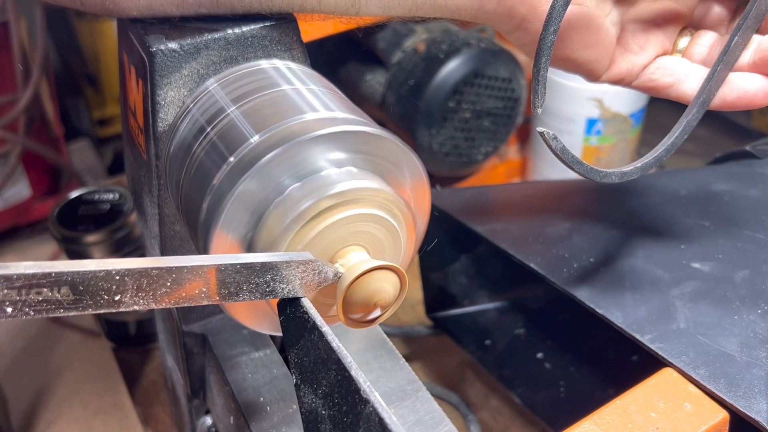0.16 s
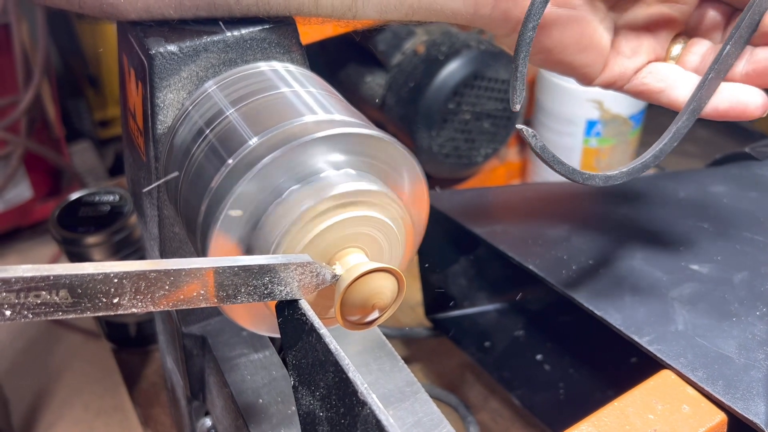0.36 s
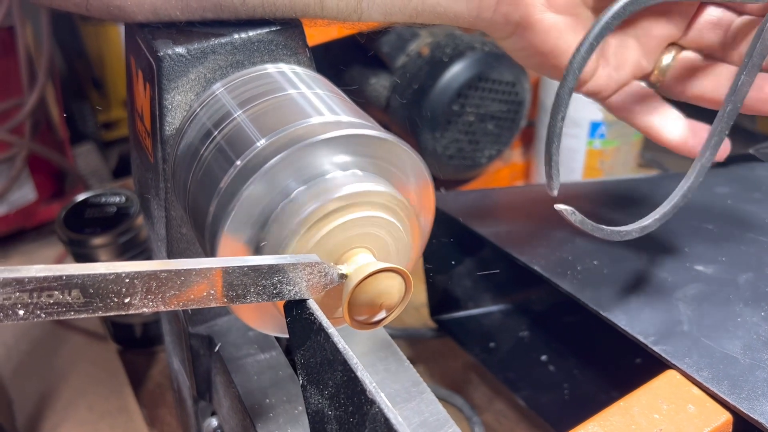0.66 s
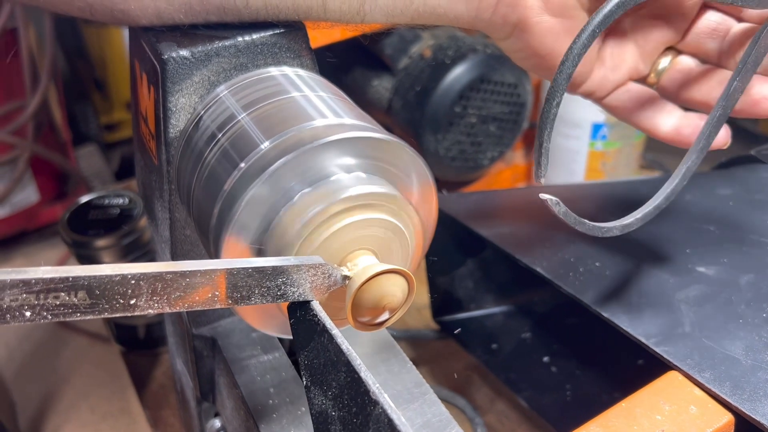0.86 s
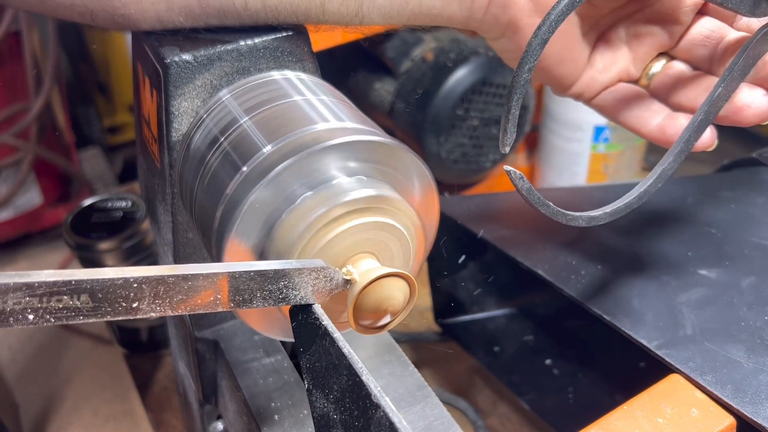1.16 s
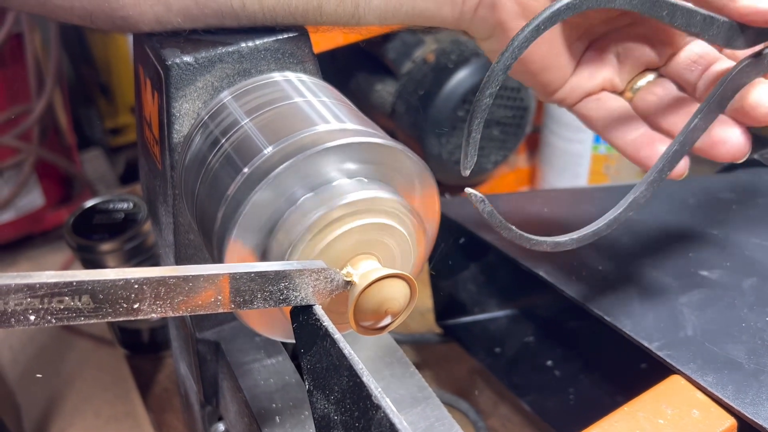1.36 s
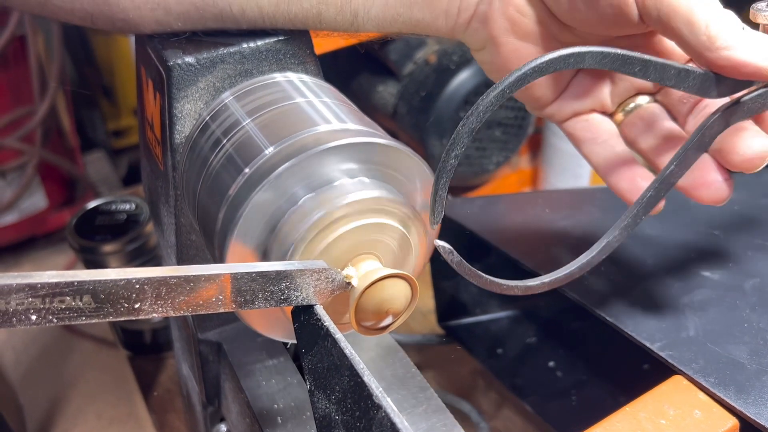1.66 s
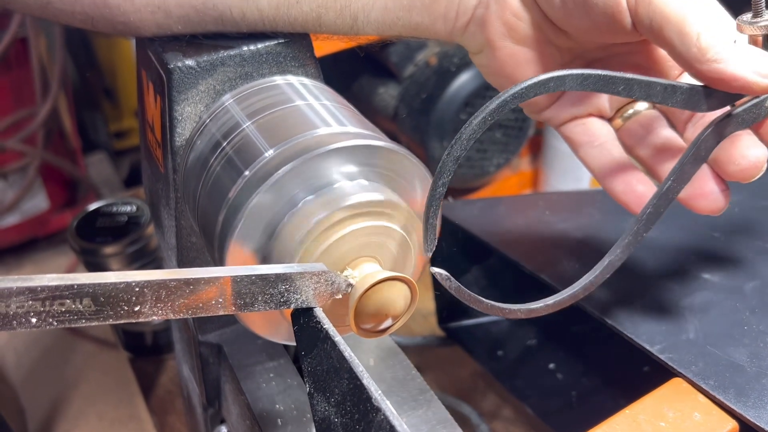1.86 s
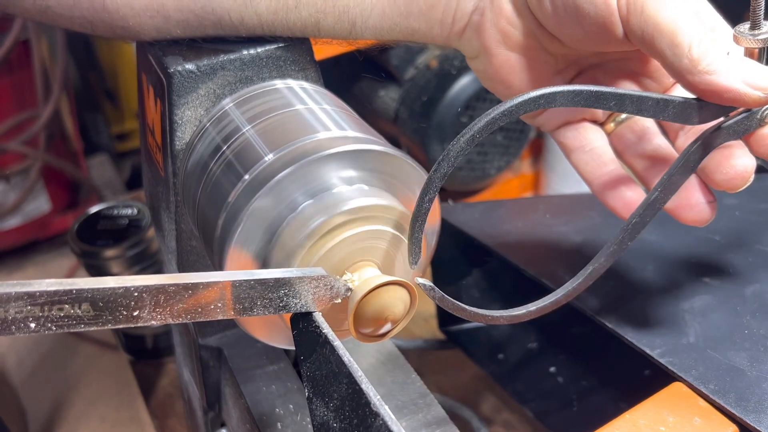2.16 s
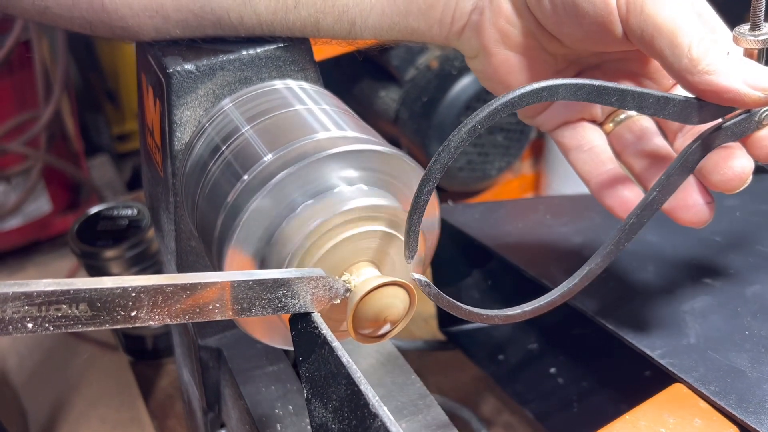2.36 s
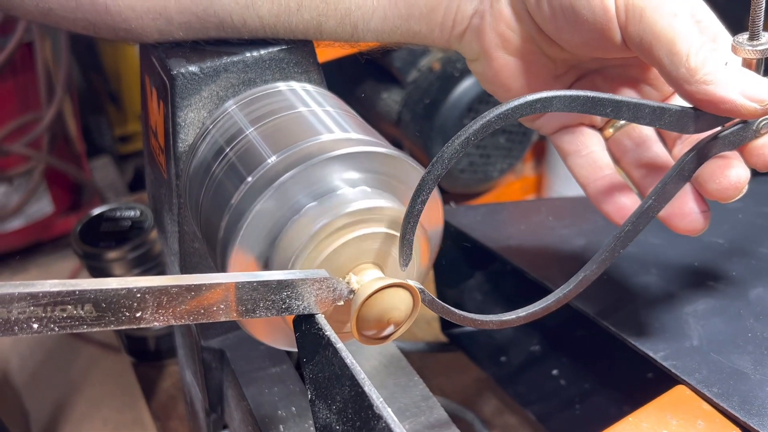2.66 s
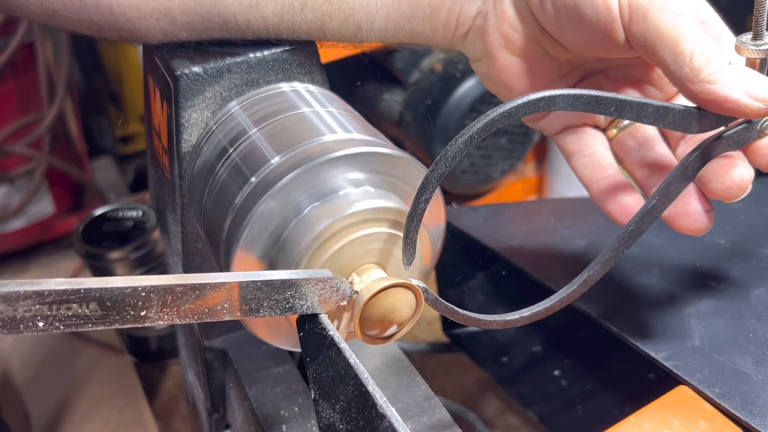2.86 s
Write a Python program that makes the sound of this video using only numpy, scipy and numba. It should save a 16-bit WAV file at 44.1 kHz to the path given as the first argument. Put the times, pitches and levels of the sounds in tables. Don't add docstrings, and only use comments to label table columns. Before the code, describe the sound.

A blade cuts spinning wood on a lathe with a continuous shrill, rough squeal, growing louder after the first second, over motor and belt hum, buzzing tool rest and hissing dust, heard close in a workshop.

```python
import sys
import numpy as np
from scipy import signal
from scipy.fft import rfft, irfft
from scipy.io import wavfile
from scipy.ndimage import uniform_filter1d, map_coordinates
from numba import njit

SR = 44100
rng = np.random.default_rng(int(sys.argv[2]) if len(sys.argv) > 2 else 0)


def to_wav(sig):
    pcm = np.clip(np.atleast_2d(sig), -1, 1) * 32767
    pcm = np.round(pcm).astype(np.int16)
    wavfile.write(sys.argv[1], SR, pcm.T)


def ratio(d):
    e = np.asarray(d, float) / 20
    return 10 ** e


N = 132300
T = np.arange(N) / SR
TURN_HZ = 46.9

# angle_turns, width_turns, level_db over soft wood, start_s, end_s
CHIP_SPOTS = [
    (.12, 0.018, 4.7, 3, 0.91),
    (.06, 0.025, 6.2, 2, 2.7),
    (.28, 0.06, 4.3, 0.2, 0.38),
    (.28, 0.033, 6.1, 2.5, 3.3),
    (.85, 0.068, 2.9, -0.5, 1.0),
    (.86, 0.021, 3.6, -2, 3.3),
]


def level(x, db):
    return x * ratio(db) / np.sqrt(np.mean(x ** 2))


@njit
def svf(x, hz, width):
    y = np.empty(len(x))
    band, low = 0., 0.
    for i in range(len(x)):
        g = np.tan(np.pi * hz[i] / SR)
        k = width / hz[i]
        v = (band + g * (x[i] - low)) / (1 + g * (g + k))
        band = 2 * v - band
        low = low + 2 * g * v
        y[i] = k * v
    return y


def walk(rate):
    hold = int(SR / rate)
    steps = np.repeat(rng.standard_normal(N // hold + 1), hold)
    return 1.24 * uniform_filter1d(uniform_filter1d(steps, hold), hold)[:N]


def colour(x, points):
    hz, db = np.array(points, float).T
    log_hz = np.log(np.arange(N // 2 + 1) * SR / N + 1)
    return irfft(rfft(x) * ratio(np.interp(log_hz, np.log(hz), db, -90, -90)), N)


def place(x, pan_db, lead):
    port = np.array([[.5], [-.5]])
    return np.real(x * np.exp(1j * lead * port)) * ratio(pan_db * port)


def spin():
    # time_s, lead_turns
    slip_points = [(0, .016), (.16, .075), (.31, .113), (.46, .132), (.61, .139), (.76, .138), (.91, .127),
                   (1.06, .104), (1.2, .076), (1.35, .051), (1.5, .03), (1.65, .015), (1.8, .006), (2.1, 0),
                   (2.7, .006), (3, -.003)]
    slip = uniform_filter1d(np.interp(T, *np.array(slip_points).T), size=5000)
    belt_hz, belt_turns, belt_rad = 13.48, .0017, 1.62
    return TURN_HZ * T + 1 + slip + belt_turns * np.cos(2 * np.pi * belt_hz * T + belt_rad)


def grain(turns):
    sameness = .992
    size = int(SR / TURN_HZ) + 1
    rim = rng.standard_normal((int(turns[-1]) + 2, size))
    for k in range(1, len(rim)):
        rim[k] = sameness * rim[k - 1] + np.sqrt(1 - sameness ** 2) * rim[k]
    return map_coordinates(rim.ravel(), [turns * size])


def bite(turns, spots):
    fade_s = 0.31
    force_db = 0
    for angle, width, db, start, end in spots:
        life = np.clip(np.minimum(T - start, end - T) / fade_s + .5, 0, 1)
        distance = (turns - angle + .5) % 1 - .5
        force_db = force_db + db * life * np.exp(-.5 * (distance / width) ** 2)
    gain = ratio(force_db)
    return gain / np.sqrt(uniform_filter1d(gain ** 2, size=4096))


def hand(column):
    # time_s, feed_db, squeal_db
    cut = [
        (0, 0, -1),
        (.35, 1, 0),
        (.7, 0, 1.5),
        (1.0, 1, 6),
        (1.3, -1, 3.5),
        (1.6, -1, 5.5),
        (1.9, -1.5, 7),
        (2.4, 0, 5.5),
        (2.7, -0.5, 6),
        (3, 0, 1.5),
    ]
    return np.interp(T, np.array(cut)[:, 0], np.array(cut)[:, column])


def tool(turns):
    # pitch_hz, width_hz, level_db, left_right_db, left_lead_rad
    modes = [(2354, 284, -42.5, -0.5, 1.46), (2585, 132, -38.5, -2, 1.47), (2776, 180, -37, 3, 0.99),
             (3269, 200, -37, 33, -1.95), (3410, 20, -47.5, 18, -0.57), (4059, 156, -35, -11, 0.059),
             (4256, 198, -24, -0.6, 0.19), (4447, 297, -29, -3, -1.6), (4870, 112, -29, 5, 0.25),
             (5672, 190, -38, 3.5, -1.7), (5920, 510, -36, 2.5, -1.62), (6713, 140, -44.5, 9, -0.086),
             (8240, 1290, -43.5, -0.5, -0.046), (11530, 610, -45, 0, 0.46)]
    # time_s, tip_hz, blade_hz
    squeal = [
        (0, 4970, 4260),
        (.6, 4960, 4260),
        (.9, 4880, 4240),
        (1.3, 4855, 4235),
        (1.7, 4885, 4215),
        (2.4, 4870, 4205),
        (3, 4840, 4215),
    ]
    # angle_turns, width_turns, level_db over soft wood, start_s, end_s
    shank_spots = [
        (0.256, 0.023, 8.5, 2.3, 3.3),
        (0.202, 0.037, 8, 6, .3),
        (0.78, 0.028, 9.5, 2.05, 1.8),
        (0.44, 0.016, -9, 1.5, 1.6),
        (0.11, 0.019, 11.5, -1, 2.1),
        (0.028, 0.017, 2.5, 1.8, 1.6),
        (0.56, 0.043, 10, 2, 3.3),
    ]
    neck_spots = [
        (0.69, 0.023, 4.5, -3, 0.67),
        (0.75, 0.023, 13, -0.5, 3.3),
        (0.81, 0.02, -2, 4, 0.87),
        (0.27, 0.048, 2, 1, 1.0),
        (0.046, 0.031, 4, -2, 3.3),
        (0.76, 0.14, -11, 1, 3.3),
        (0.35, 0.017, -3, 3, 3.3),
    ]
    blade_spots = [
        (0.62, 0.038, 10, -1.9, .95),
        (0.7, 0.049, 15.5, 1.85, 3.3),
        (.49, 0.027, 6, -6, 0.32),
        (0.59, 0.017, 8.5, -2, 0.45),
        (.65, 0.021, 13, 0, 1),
        (0.043, 0.064, 3.5, 0.9, 1.52),
        (0.32, 0.017, 11, -6, 3.3),
        (0.56, 0.068, 2.5, 0, 3.3),
        (0.37, 0.074, -8.5, -5, 3.3),
    ]
    tip_spots = [
        (0.706, 0.051, 14, -.2, 1.12),
        (0.7, 0.14, 12, 0.89, 3.3),
        (.65, 0.043, 5.4, 0.87, 3.3),
        (0.22, 0.05, 6.8, -0.053, 2.6),
        (0.6, 0.033, 7.3, 1.3, 3),
        (0.37, 0.032, 4.5, 0.38, 0.31),
    ]
    when, tip_hz, blade_hz = np.array(squeal).T
    near, far = grain(turns), grain(turns)
    wall_wet, squeal_limit = 0.37, 0.6
    out = 0
    for k, (hz, width, db, pan_db, lead) in enumerate(modes):
        tip = 4700 < hz < 5200
        if hz < 3000:
            spots = shank_spots
        elif hz < 3800:
            spots = neck_spots
        elif hz < 4700:
            spots = blade_spots
        else:
            spots = tip_spots if tip else CHIP_SPOTS
        if tip:
            centre = np.interp(T, when, tip_hz)
        elif k == 6:
            centre = np.interp(T, when, blade_hz)
        else:
            centre = np.full(N, 1. * hz)
        rung = [svf(svf(g, centre, 1. * width), centre, 1. * width) for g in (near, far)]
        direct, wall = [signal.hilbert(level(r, 0)) for r in rung]
        direct = direct / (np.abs(direct) + 0.033) ** squeal_limit
        both = place(direct, pan_db, lead) + wall_wet * place(wall, pan_db, lead + np.pi)
        both = bite(turns, spots) * both
        both = np.array([svf(port, centre, 2.7 * width) for port in both])
        out = out + level(both, db) * ratio(hand(column=2) if tip else .5 * walk(2))
    return out * ratio(hand(column=1))


def tone(hz, wander_hz, flutter_db, rate):
    strength = ratio(flutter_db * walk(rate))
    cycles = np.cumsum(hz + wander_hz * walk(rate)) / SR + rng.random()
    return strength * np.exp(2j * np.pi * cycles)


def lathe():
    # pitch_hz, level_db, left_right_db, left_lead_rad
    motor = [(299.5, -49.5, -3, 0.16), (880.7, -41, 1.5, -2), (996, -45, 20, 0.5), (1030, -74, 13, 1),
             (1103, -41, -1, -0.2), (1129, -46.5, -6, -0.5), (1278.4, -44.5, 11, -2),
             (1295.4, -45, 12, 0.1), (1347, -42, -3.5, -2)]
    # multiple of the turn, level_db
    spindle = [(1, -37), (2, -14.5), (3, -4), (4, -22), (5, -17), (6, -7), (7, -3.5), (8, -6), (9, -8.5),
               (10, -13.5), (11, -11), (12, -8), (13, -7), (14, -3.5), (15, -19), (16, -27)]
    out = 0
    for hz, db, pan_db, lead in motor:
        out = out + level(place(tone(hz, 2.3, 1.3, 14), pan_db, lead), db)
    for k, db in spindle[1:]:
        out = out + level(place(tone(k * TURN_HZ, 1.2, 2.5, 9), -0.68, 0.07 * k), db - 48)
    shake = level(place(tone(TURN_HZ, .2, 1, 3), 1.5, .1), -52)
    return out + shake * ratio(-1.7 * T)


def rest():
    # start_s, end_s, pitch_hz, level_db, left_right_db
    buzzes = np.array([(.26, .545, 322, -35, -6), (.57, .82, 322, -41, -7), (.82, 1.07, 322.5, -33, -7.5),
              (2.68, 3.2, 281, -44, 7), (-.1, .3, 300, -44, -2), (.4, .56, 300, -45, -2),
              (.8, 1.1, 300, -45, -2), (.88, 1.06, 460, -54, 3), (-.1, .58, 885, -47, -2),
              (1.0, 1.42, 142, -45, 0), (2.8, 3.2, 142, -44, 0), (-.1, .25, 1282, -46, 2),
              (-.1, .25, 1345, -47, -2)])
    rise_s, fall_s = 0.04, 0.025
    out = 0
    for start, end, hz, db, pan_db in buzzes:
        rise = np.clip((T - start) / rise_s, 0, 1)
        fall = np.exp(-np.clip(T - end, 0, 9) / fall_s)
        out = out + level(place(tone(hz, 1.37, 0.79, 15.1), pan_db, 0), db) * rise * fall
    return out


def air(points, db, wet, gain, lag_s, rim=0, share=0):
    noise = share * rim + np.sqrt(1 - share ** 2) * rng.standard_normal((2, N))
    right, side = colour(gain * noise, points)
    hz = np.arange(N // 2 + 1) * SR / N
    left = irfft(rfft(right) * np.exp(-2j * np.pi * hz * lag_s), N)
    side = wet * signal.lfilter(*signal.butter(1, 500, "high", fs=SR), side)
    return level(np.array([left + side, right - side]), db)


def chips(turns):
    # pitch_hz, level_db per Hz
    chip_points = [(1300, -12), (1900, -20.5), (2600, -11), (4400, 0), (5100, -7), (6500, -8), (7200, -26)]
    # pitch_hz, level_db per Hz
    dust_points = [(6400, -24), (7200, 0.5), (9500, -3), (11500, -7.5), (13000, -7), (15650, -1),
                   (15800, -48)]
    rim = np.array([grain(turns), grain(turns)])
    grain_share = .85
    fading = np.interp(T, [0, 3], [1.0, -1.0])
    spray = bite(turns, CHIP_SPOTS) * ratio(.5 * walk(2.56)) * ratio(fading)
    coarse = air(chip_points, -27.5, 0.62, spray, 0, rim, grain_share)
    dust = air(dust_points, -36.5, 0.36, spray, .000262, rim, grain_share / 2)
    return coarse + dust


def shop():
    # pitch_hz, level_db per Hz
    shop_points = [(30, -43), (60, -9), (100, -17.5), (150, -0.5), (300, -11.5), (750, -11), (1200, -7),
                   (1600, -18)]
    return air(shop_points, -39, 0.81, ratio(0.08 * walk(4.2)), 0)


def scene():
    turns = spin()
    return tool(turns) + lathe() + rest() + chips(turns) + shop()


def top_cut(x):
    return signal.sosfilt(signal.butter(12, 17110, fs=SR, output="sos"), x)


def record(dry):
    paired_from_hz, drop_db, scatter_db = 6900, -4, 2.5
    mid_side = np.array([dry[0] + dry[1], dry[0] - dry[1]]) / 2
    f, _, z = signal.stft(mid_side, SR, nperseg=2048)
    band = np.abs(z[:, :1024]).reshape(2, 64, 16, -1) ** 2
    power = np.repeat(uniform_filter1d(band.sum(axis=2), size=2), 16, axis=1)
    scatter = np.repeat(rng.standard_normal((64, power.shape[2])), 16, axis=0)
    doubt = ratio(2 * drop_db + scatter_db * scatter)
    z[:, :1024] *= (power > power[::-1] * doubt) | (f[:1024, None] < paired_from_hz)
    mid, side = signal.istft(z, SR, nperseg=2048)[1][:, :N]
    return top_cut(np.array([mid + side, mid - side]))


dry = scene()
out = record(dry)
to_wav(out)
```